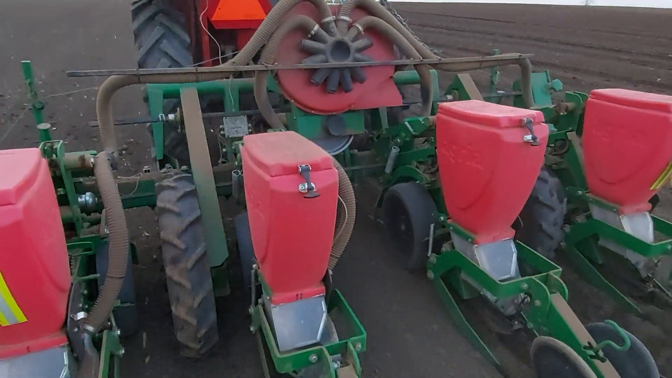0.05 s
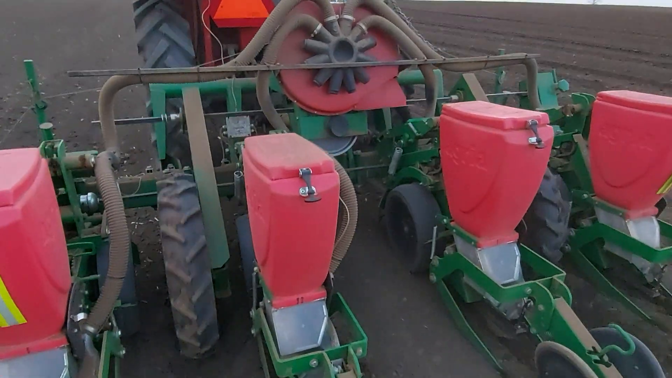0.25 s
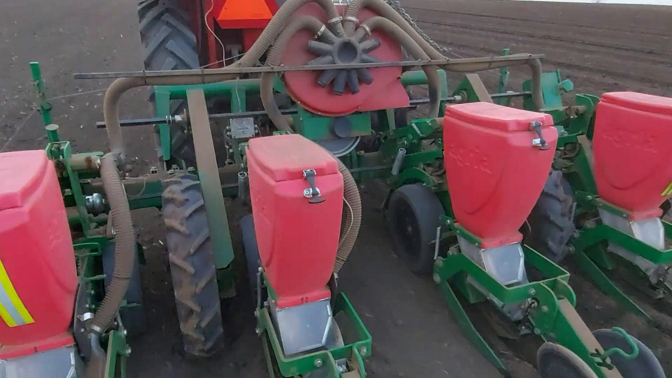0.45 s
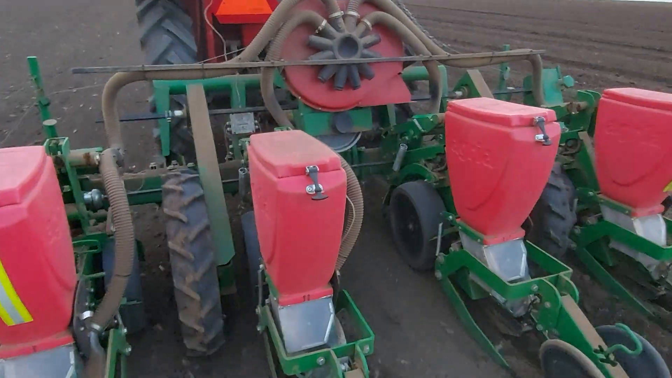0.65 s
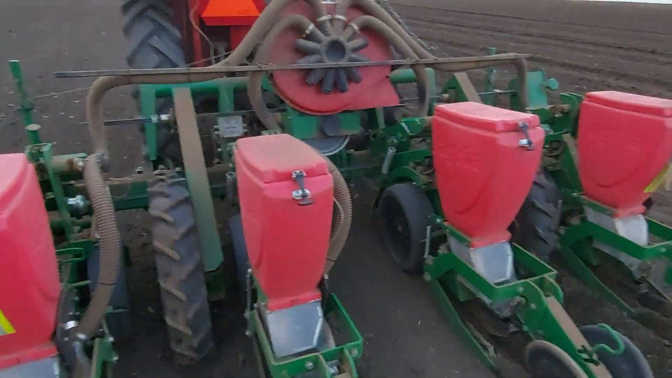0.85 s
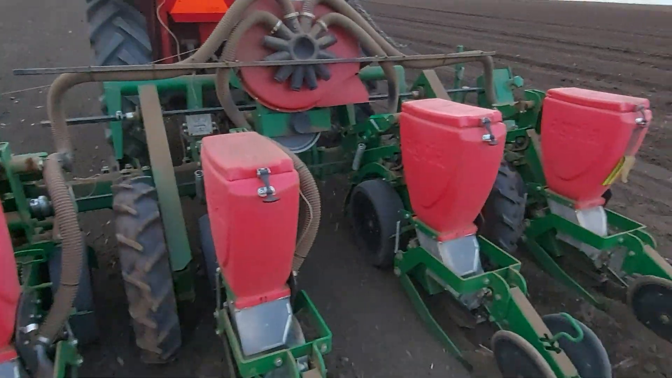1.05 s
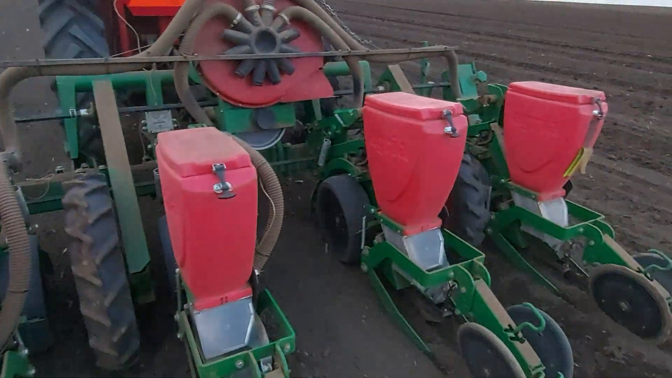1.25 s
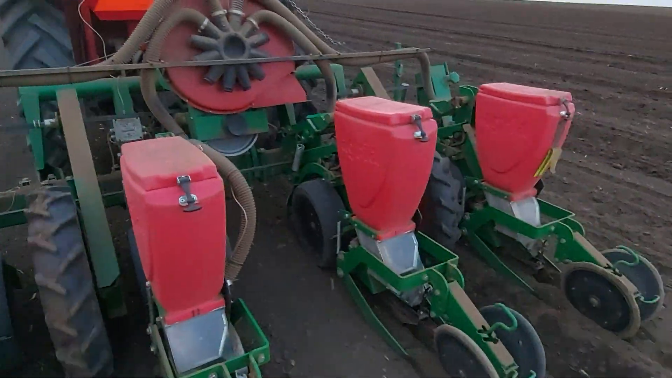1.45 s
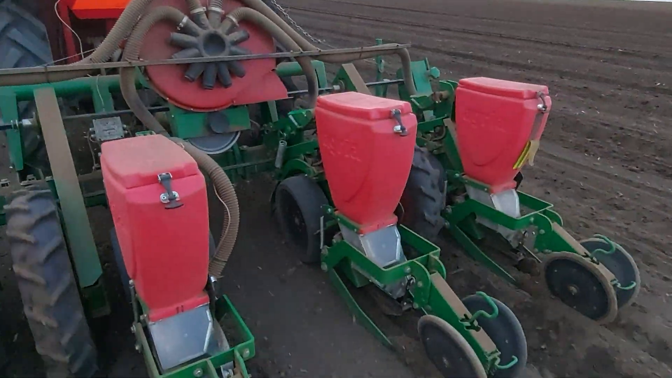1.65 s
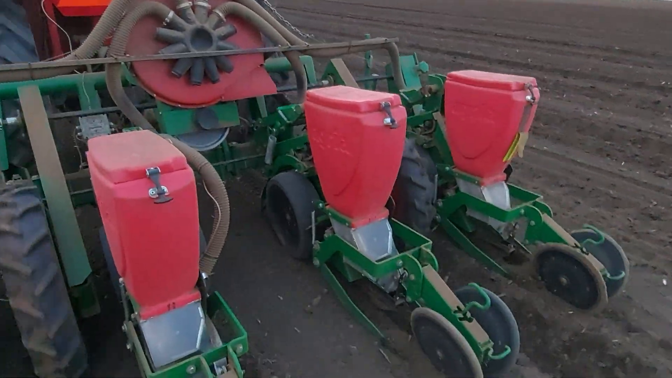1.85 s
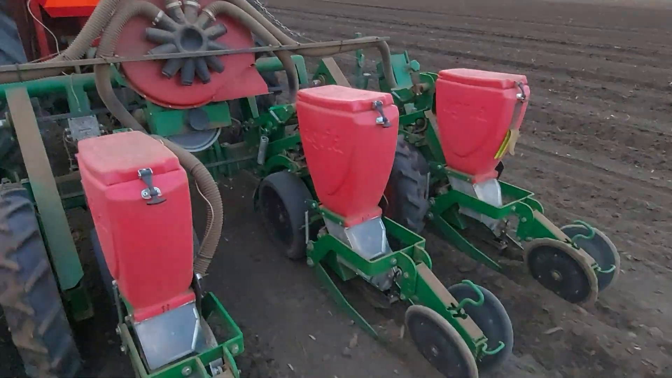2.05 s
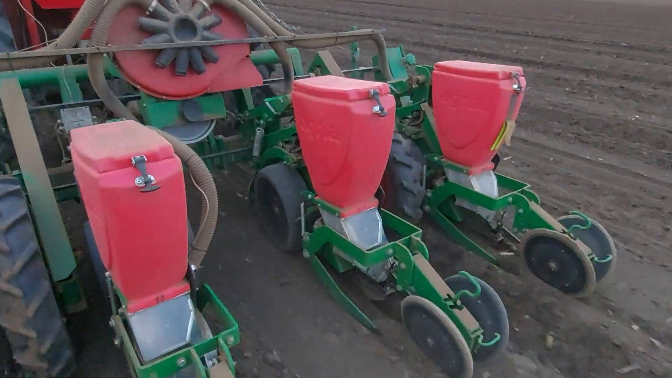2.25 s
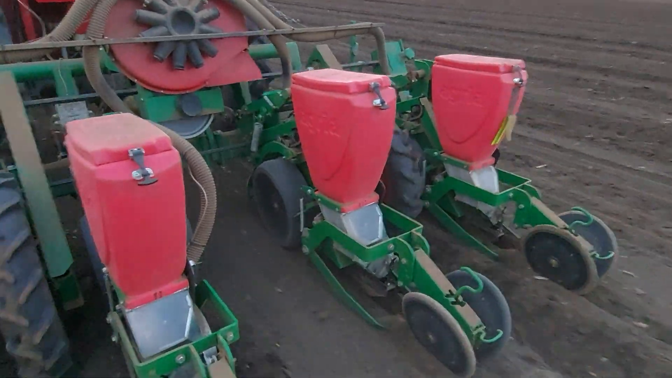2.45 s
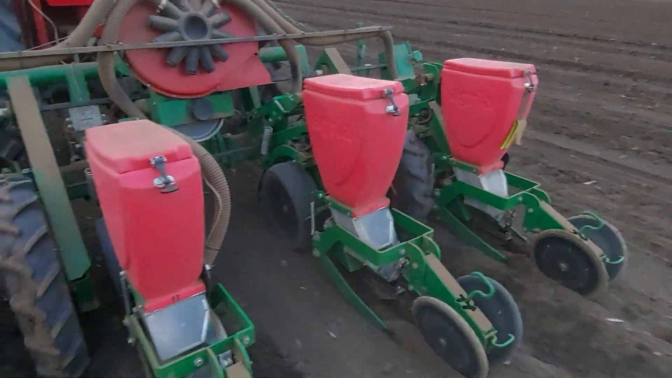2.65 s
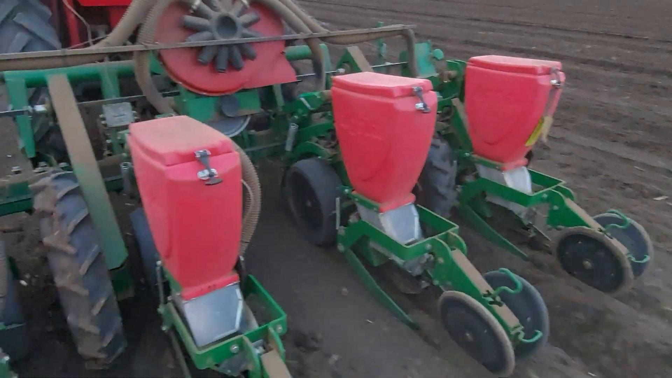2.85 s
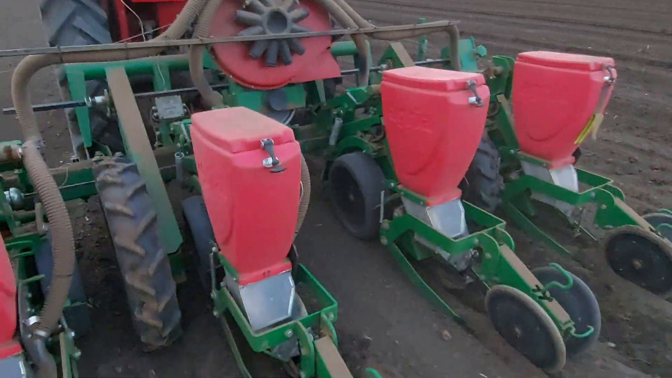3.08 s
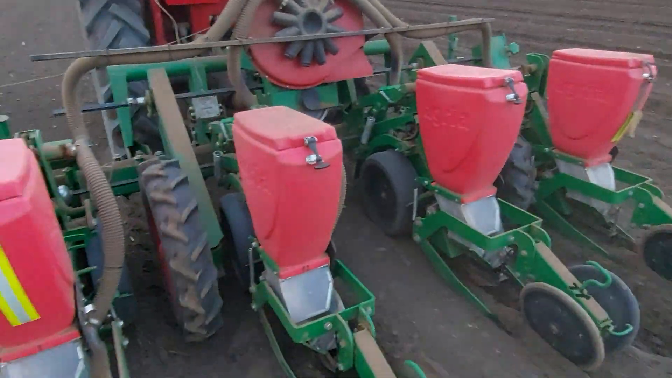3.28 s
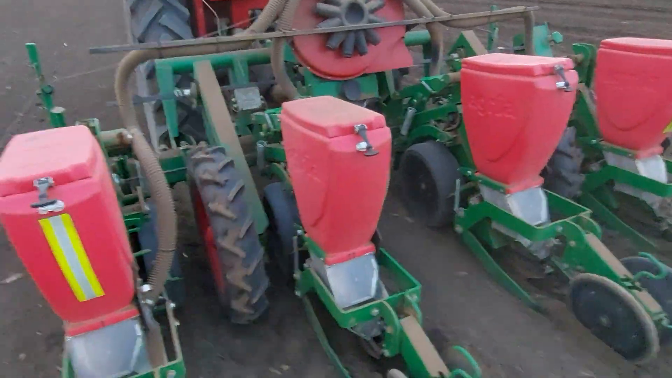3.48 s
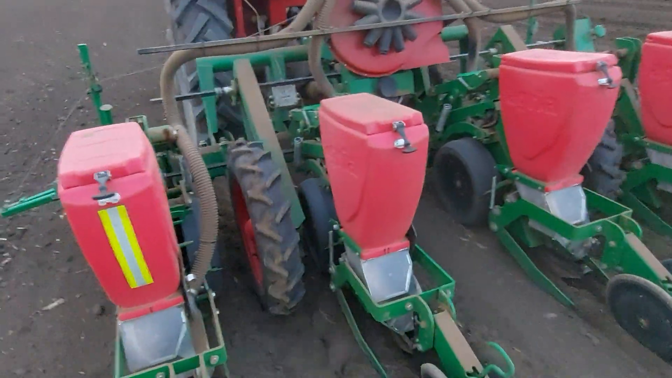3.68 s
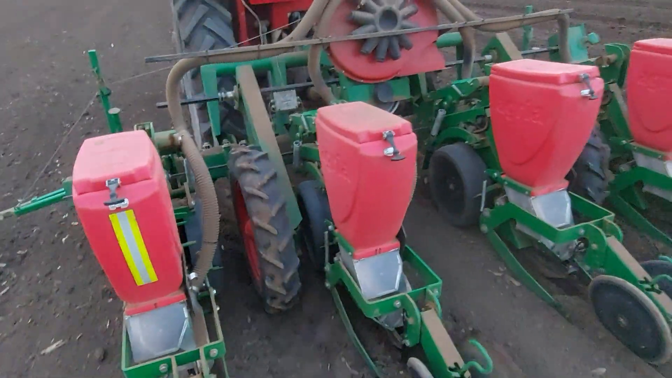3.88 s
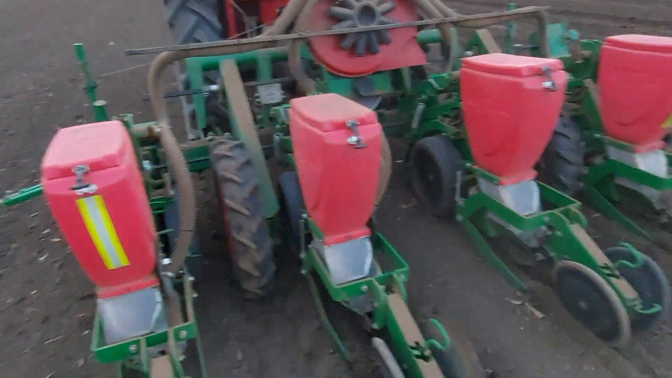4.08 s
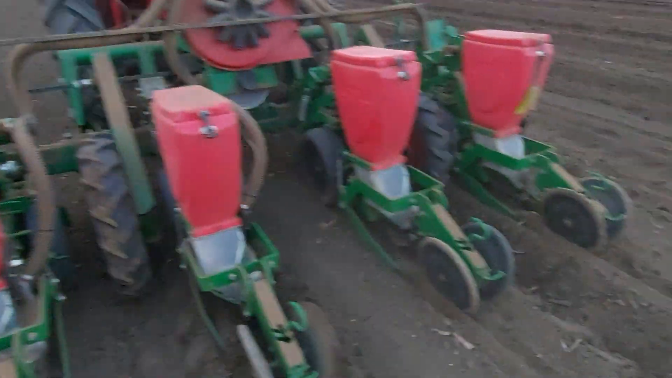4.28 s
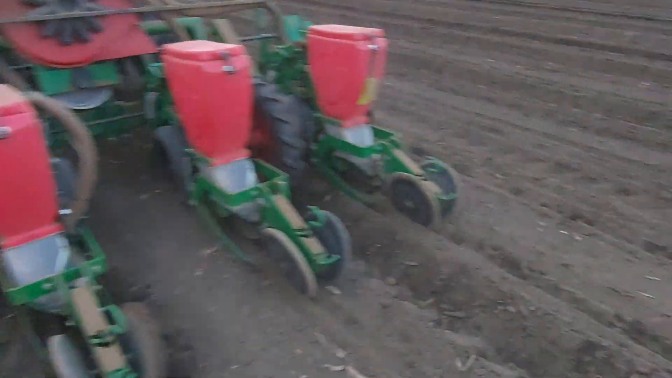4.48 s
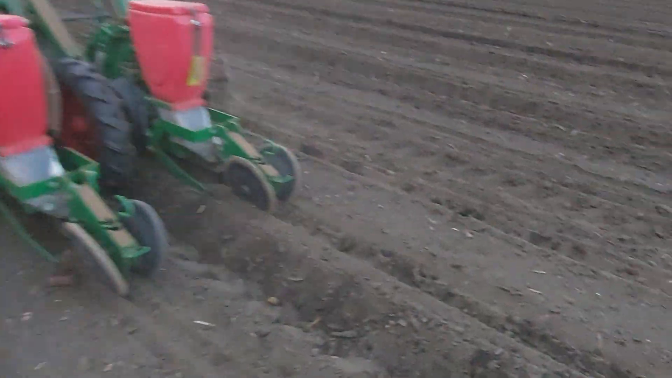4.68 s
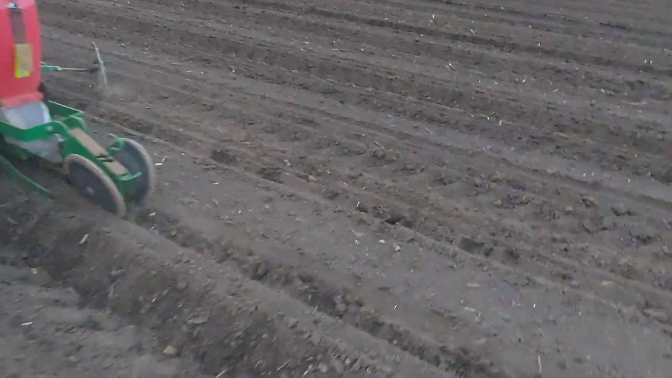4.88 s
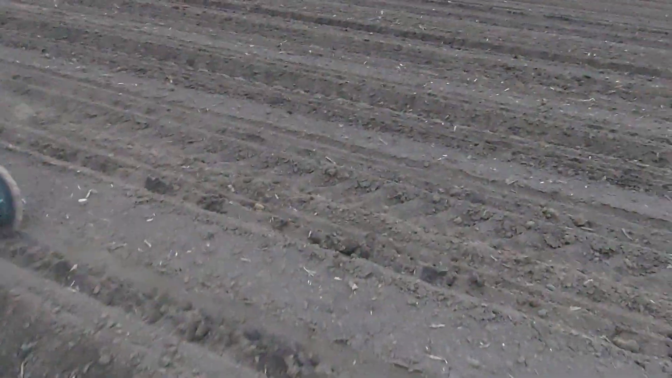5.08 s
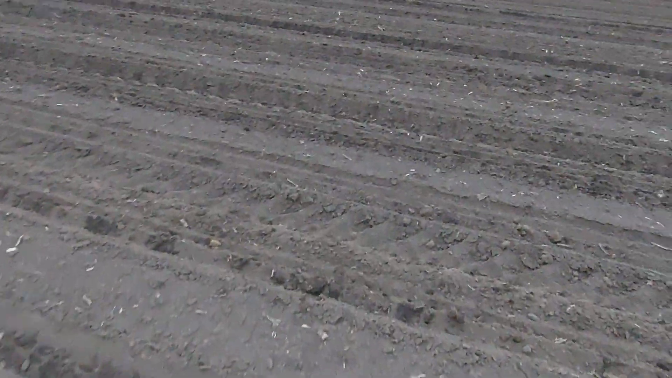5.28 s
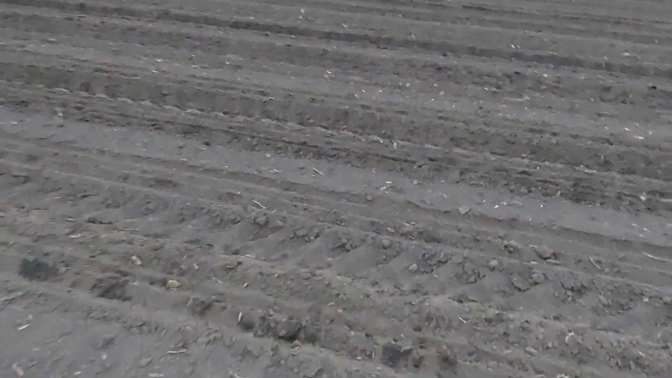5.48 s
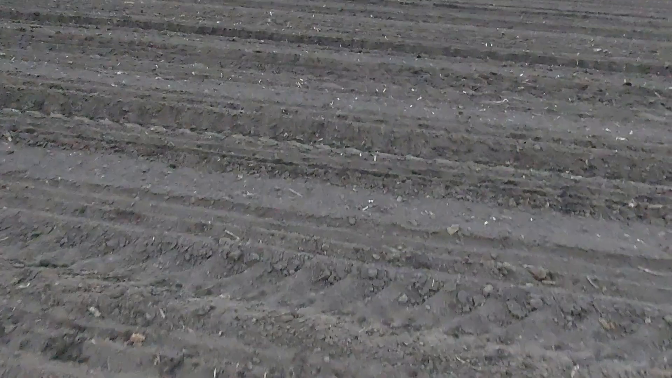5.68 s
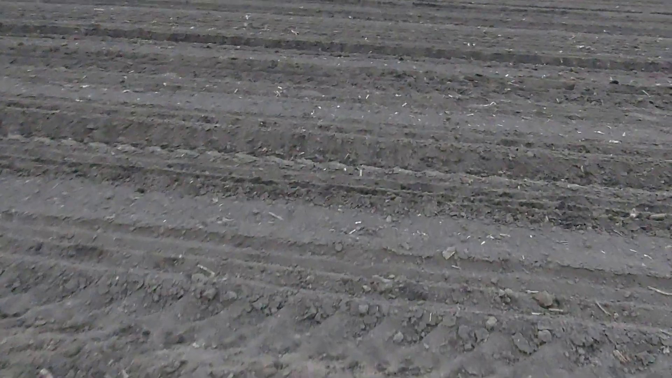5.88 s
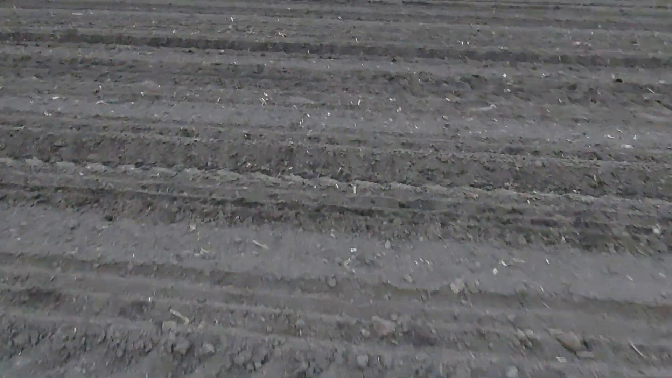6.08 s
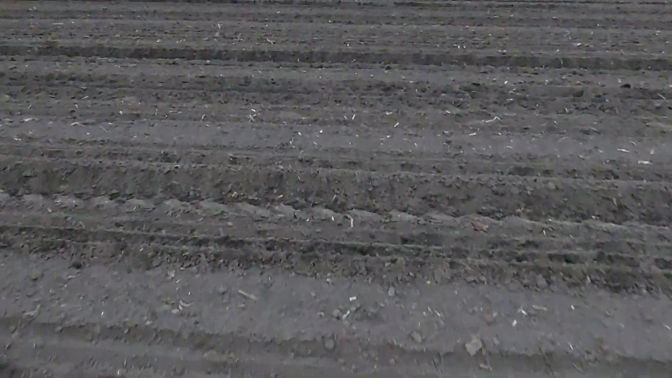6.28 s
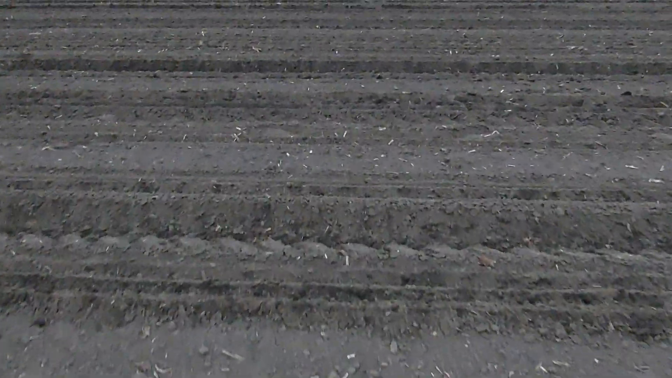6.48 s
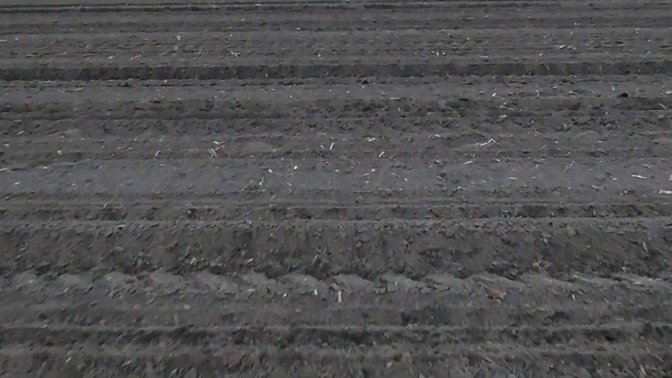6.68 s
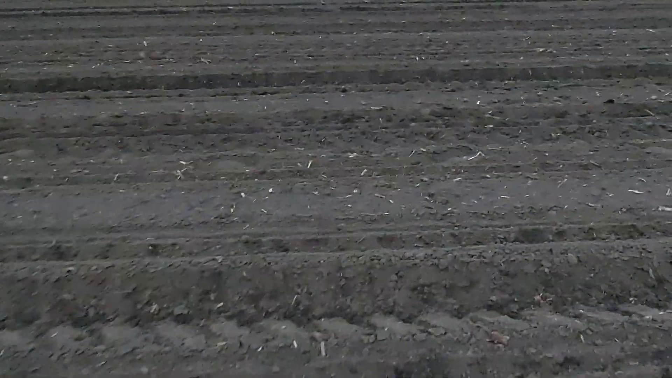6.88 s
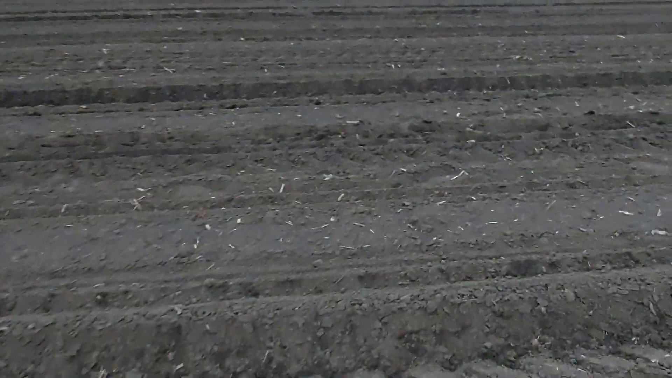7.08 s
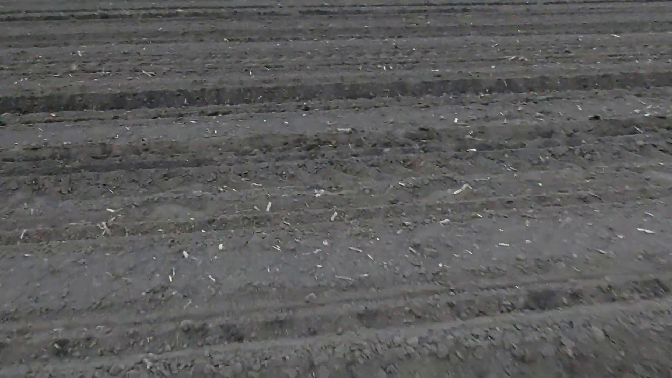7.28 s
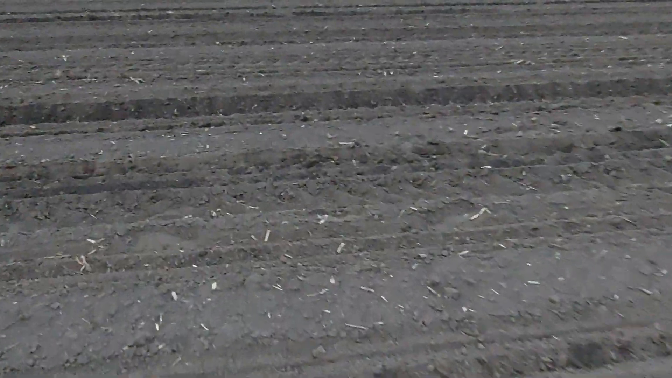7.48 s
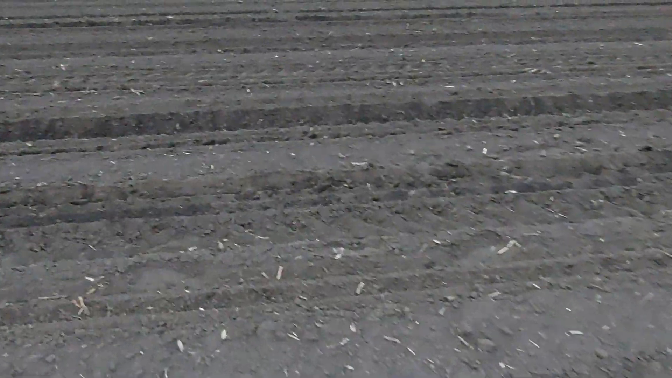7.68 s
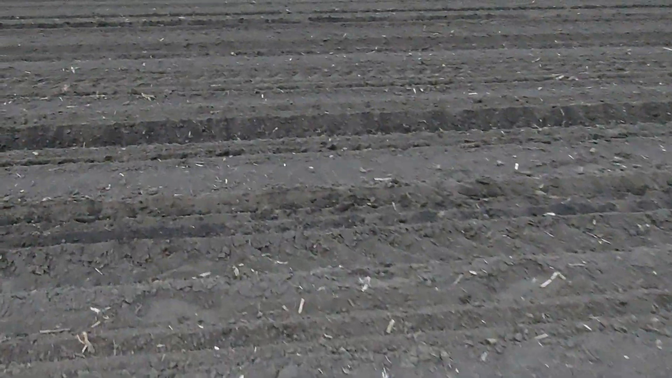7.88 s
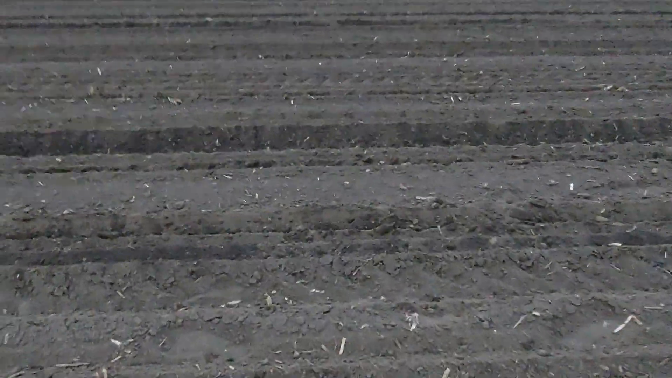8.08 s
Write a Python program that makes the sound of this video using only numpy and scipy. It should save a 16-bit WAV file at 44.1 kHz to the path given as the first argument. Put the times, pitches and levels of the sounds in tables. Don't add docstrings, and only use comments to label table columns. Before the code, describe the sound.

A loud, steady mid-pitched whine from a planter's vacuum fan dominates, wrapped in rough air roar and bright hose hiss, with a tractor engine humming low at fast idle. Heard close by in stereo in an open field. Just past the middle the listener turns away: the sound swings left, drops in level, loses its brightness and sinks very slightly in pitch, continuing to the end.

```python
import sys
import numpy as np
from scipy import signal
from scipy.io import wavfile
from scipy.ndimage import uniform_filter1d

SR = 44100
rng = np.random.default_rng(int(sys.argv[2]) if len(sys.argv) > 2 else 0)


def put_to_file(sound):
    columns = np.atleast_2d(sound).T
    safe = np.clip(columns, -1, 1)
    whole_steps = np.round(safe * 32767)
    wavfile.write(sys.argv[1], SR, whole_steps.astype(np.int16))


def gain_from_db(level_db):
    decades = np.asarray(level_db, float) / 20
    return 10 ** decades


N = 358974
TIME = np.arange(N) / SR
FRAME, HOP = 2048, 512

# (time [s], lead of the left one [ms])
TURN = [(0.0, -0.04), (0.45, -0.05), (1.63, 0.13), (2.1, 0.14), (2.44, 0.13), (3.66, -0.13), (4.07, -0.07),
        (4.27, 0.05), (4.48, 0.26), (4.68, 0.39), (4.88, 0.39), (5.09, 0.476), (5.45, 0.512), (6.0, 0.51),
        (6.51, 0.5), (6.92, 0.48), (7.28, 0.436), (8.14, 0.49)]
# (time [s], share [0-1])
AWAY = [
    (4.3, 0),
    (4.9, 0.34),
    (5.5, 0.78),
    (6.8, 1),
]
# (time [s], frequency [Hz])
BLADE_PITCH = [(0.0, 624.2), (0.48, 624.2), (0.96, 624.8), (1.44, 623.7), (1.92, 624.2), (2.39, 623.8),
               (2.87, 623.8), (3.35, 622.9), (3.83, 623.4), (4.31, 623.0), (4.79, 622.0), (5.27, 619.9),
               (5.75, 618.6), (6.22, 619.2), (6.7, 617.6), (7.18, 618.1), (7.66, 618.2), (8.14, 617.7)]
# (time [s], level [dB], left minus right [dB], left lead [ms])
BLADE_TONE = [(0.0, -11.5, 0, -0.05), (0.6, -12.5, 1.5, -0.067), (1.14, -11, -0.8, 0.04),
              (1.7, -13.5, -0.5, 0.07), (2.3, -12.5, -4, 0.1), (2.86, -14.5, -1, -0.032),
              (3.4, -13, 0, -0.053), (3.86, -13.5, 0.8, -0.17), (4.28, -13, -0.8, 0.01),
              (4.6, -11.5, 2.5, 0.091), (4.97, -23.5, 8, 0.4), (5.2, -19, 3.5, 0.41),
              (5.45, -23, 5.5, 0.52), (6.0, -19, 0, 0.64), (6.2, -20, -2.5, 0.52), (6.68, -17, -3.5, 0.44),
              (7.05, -18.5, 2.5, 0.32), (8.14, -21, 1.2, 0.32)]
# (lead [ms], left [dB], right [dB])
OCTAVE = [(-0.13, -24.5, -28.5), (-0.04, -26.5, -31), (0.02, -29, -30.5), (0.07, -46, -26.5),
          (0.15, -50, -28.5), (0.26, -29, -31), (0.39, -29.5, -38), (0.45, -35, -34.5), (0.52, -38, -44)]
# (lead [ms], upper left [dB], upper right [dB], lower left [dB], lower right [dB])
ROAR = [(-0.13, -25, -25.1, -24, -24), (-0.04, -22.5, -23.5, -24, -24), (0.06, -22, -23.5, -23, -23.3),
        (0.14, -21, -22, -22, -24.5), (0.26, -23.4, -24.5, -20.5, -23), (0.39, -24.5, -23.5, -27, -22),
        (0.45, -27.5, -29.5, -25.5, -25), (0.52, -27.5, -26, -27.5, -25.5)]
ROAR_LOSS = [0.61, 0.6, 1.2, 2.7]
# (lead [ms], middle left [dB], middle right [dB], top left [dB], top right [dB])
HISS = [(-0.13, -28.5, -24, -36, -29), (-0.04, -28, -25.5, -34.5, -30.5), (0.06, -27, -24, -32.4, -31.6),
        (0.14, -26.5, -23.2, -31.5, -31), (0.26, -27, -22.5, -32, -29), (0.39, -28, -21.5, -33, -32),
        (0.45, -30, -23.5, -34, -34), (0.52, -30, -24.5, -34.5, -38)]
HISS_LOSS = [1.65, 0.54, 1.3, 4.3]
# (frequency [Hz], density [dB per Hz])
HISS_FACING = [
    [(1500.0, 3.5), (1900.0, 0), (2300.0, 2), (3000.0, -2), (3600.0, 0.5), (4200.0, -1), (5000.0, -2.5), (6000.0, -0.5), (7200.0, -2.5), (8300.0, -9.5), (9200.0, -4), (10500.0, -8), (12000.0, -5.5), (15500.0, -8)],
    [(1500.0, -4), (1900.0, -1), (2300.0, -1), (3000.0, -0.5), (3600.0, -1), (4200.0, 0), (5000.0, 1.5), (6000.0, 3), (7200.0, -0.5), (8300.0, 0.5), (9200.0, -4), (10500.0, 0), (12000.0, 3.5), (15500.0, 2)],
]
# (frequency [Hz], density [dB per Hz])
HISS_AWAY = [
    [(1500.0, 0.0), (1900.0, -2.0), (2300.0, -0.0), (3000.0, -3.0), (3600.0, -2.0), (4200.0, -2.0), (5000.0, -5.0), (6000.0, -4.0), (7200.0, -8.0), (8300.0, -10.0), (9200.0, -11.0), (10500.0, -9.0), (12000.0, -6.0), (15500.0, -12.0)],
    [(1500.0, -3.0), (1900.0, -2.0), (2300.0, -2.0), (3000.0, -2.0), (3600.0, 0.0), (4200.0, -0.0), (5000.0, -7.0), (6000.0, -5.0), (7200.0, -7.0), (8300.0, -5.0), (9200.0, -15.0), (10500.0, -20.0), (12000.0, -18.0), (15500.0, -19.0)],
]
# (frequency [Hz], density [dB per Hz])
ROAR_FACING = [(190, -8.5), (230, -13), (290, -3), (370, -8.5), (430, -0.5), (490, -5), (560, 2),
               (650, -1.5), (720, -7.5), (810, -6), (870, -2), (960, -7.5), (1110, 0), (1400, -13.5)]
# (frequency [Hz], density [dB per Hz])
ROAR_AWAY = [(190, -7), (240, -10), (300, -5), (400, -3), (560, 0), (650, -1), (740, -5), (850, -7),
             (1010, -9), (1100, -5.5), (1180, -10), (1400, -14)]
# (frequency [Hz], density [dB per Hz])
RUMBLE = [(22, -21), (43, -9), (64, -3), (130, 3.5), (170, 0.5), (200, -8)]
# (time [s], level [dB])
RUMBLE_LEVEL = [
    (0, -30),
    (4.4, -30),
    (5.2, -34),
    (8.14, -33.5),
]
# (frequency [Hz], facing [0-1], away [0-1], extra lead away [rad])
LIKENESS = [(60, .87, .92, 0), (400, .96, .97, -.2), (1150, .93, .98, -.35), (1450, .55, .98, -.6),
            (2300, .6, .92, -.4), (3700, .5, .93, .05), (7000, .28, .86, 0), (10000, .15, .76, 0),
            (15000, .1, .6, 0)]
# (time [s], share of the extra lead)
BENDING = [(4.4, 0.0), (4.7, -1), (5.3, 0.53), (6.2, 1), (7.25, 1.45), (8.14, 1.2)]
# (time [s], frequency [Hz], depth [dB])
SHADOW = [(0, 1600, -1.5), (2.8, 1754, 1.5), (3.3, 3350, -0.5), (4.1, 3300, 2.5), (4.3, 2010, 0),
          (5.1, 3100, 11), (5.8, 4200, 7), (6.3, 5000, 2.5), ]
# (time [s], frequency [Hz], depth [dB])
GROUND_DIP = [(4.3, 430, -1), (4.8, 473, 6.5), (5.2, 510, 6), (5.6, 760, 4), (6.8, 980, 4), (8.14, 975, 9)]
# (time [s], frequency [Hz], depth [dB], negative lifts)
GROUND_LIFT = [(4.4, 300, 2.5), (5.0, 320, -5.5), (5.7, 382, -2.5), (6.5, 524, -3.5), (7.0, 740, -6.5),
               (8.14, 785, -6)]
# (time [s], frequency [Hz], depth [dB], negative lifts)
UPPER_LIFT = [
    (4.4, 720, 2),
    (4.75, 745, -8),
    (5.05, 790, -7.5),
    (5.4, 850, 0),
]
# (time [s], frequency [Hz], depth [dB], negative lifts)
HOSE_SONG = [
    (1.0, 2130, -1),
    (2.4, 2130, -5),
    (3.2, 2130, -7),
    (3.9, 2130, 2),
]
# (frequency [Hz], facing [dB], away [dB])
HOSES = [(1355, 4, 6), (1550, 2, 5), (1705, 4, 1), (1950, 3, 1), (2195, 1, 4), (2530, 4, 4), (2870, 4, 2),
         (3680, 3, 4), (4030, 3, 1), (4092, 5, 5), (4200, 1, 6), (4467, 3, 1), (5250, 3, 6)]
# (order, facing [dB], away [dB], unsteadiness [dB])
EXHAUST = [(2, -26, -25.5, 0.8), (3, -32, -30, 1), (4, -46, -50, 1), (5, -33.5, -39, 1.5), (6, -48, -48, 2),
           (7, -49.5, -48, 1), (8, -43.5, -46, 2)]
# (share of the blade pitch, facing [dB], away [dB])
GEARS = [(.624, -38, -41), (.867, -37, -45), (.977, -38, -50), (1.2466, -39, -40), (1.395, -40, -54),
         (1.56, -42, -49), (2.933, -49, -58), (3.425, -46, -50), (3.73, -56, -48), (4.008, -50, -50),
         (5, -52, -54)]
# (time [s], peak level [dB])
BUMPS = [
    (2.86, -28.5),
]


def in_time(rows, at):
    s, *columns = np.transpose(rows)
    return np.array([np.interp(at, s, column) for column in columns])


def at_hz(points, hz):
    return in_time([(np.log(p[0]), *p[1:]) for p in points], np.log(hz + 1))


def drift(rate, count, step=1):
    coarse = rng.standard_normal((count, N // 64 + 4000))
    r = np.exp(-128 * np.pi * rate / SR)
    slow = signal.lfilter([1], [1, -2 * r, r * r], coarse)[:, 3000:]
    slow = slow / slow.std(axis=1, keepdims=True)
    place = np.arange(0, N + FRAME, step) / 64
    return np.array([np.interp(place, np.arange(len(row)), row) for row in slow])


def turned(at):
    return np.clip(in_time(AWAY, at)[0], 0, 1)


def tone(hz, lead_ms, db, phase=0):
    half_lead = hz * lead_ms / 2000 * np.array([[1], [-1]])
    turns = np.cumsum(hz) / SR + half_lead
    return np.sqrt(2) * gain_from_db(db) * np.sin(2 * np.pi * turns + phase)


def fan():
    pitch, turn_lead = in_time(BLADE_PITCH, TIME)[0], in_time(TURN, TIME)[0]
    level_db, pan_db, lead_ms = in_time(BLADE_TONE, TIME)
    level_db = level_db + 0.6 * drift(2.05, count=1)[0, :N]
    flutter, waver, flutter_up = drift(16, count=3)[:, :N]
    blade_db = level_db + np.outer([0.5, -0.5], pan_db) + 0.5 * flutter
    octave_db = in_time(OCTAVE, turn_lead) - 1.5 + 2.5 * flutter_up
    blade = tone(pitch, lead_ms, blade_db, 0.09 * waver)
    octave = tone(2 * pitch, turn_lead - 0.03, octave_db, 0.62 * waver)
    return blade + octave


def heard(by_direction, loss_db_per_s, at):
    walked_s = np.maximum(at - 4.87, 0)
    return in_time(by_direction, in_time(TURN, at)[0]) - np.outer(loss_db_per_s, walked_s)


def dip(rows, hz, at, width):
    dip_hz, dip_db = in_time(rows, at)
    distance = np.log(hz[:, None] / dip_hz + 1e-9) / width
    return gain_from_db(-dip_db * np.exp(-distance ** 2))


def layer(hz, facing, away, turn, low_hz, high_hz, level_db, used_hz):
    colour = gain_from_db(at_hz(facing, hz).T * (1.5 - turn) + at_hz(away, hz).T * turn) ** 2
    total = colour[(hz > low_hz) & (hz < high_hz)].sum(axis=0)
    inside = (hz >= used_hz[0]) & (hz < used_hz[1])
    return colour * inside[:, None] * gain_from_db(level_db) ** 2 / total


def resonances(hz, at, turn):
    speed = in_time(BLADE_PITCH, at)[0] / BLADE_PITCH[0][1]
    width_hz, ridge_db = 21, 0
    for mode_hz, near, far in HOSES:
        ridge = np.exp(-((hz[:, None] - mode_hz * speed) / width_hz) ** 2)
        ridge_db = ridge_db + (near + (far - near) * turn) * ridge
    ripple = uniform_filter1d(rng.standard_normal(len(hz)), size=2) * (hz > 700) * (hz < 9000)
    return gain_from_db(ridge_db) * gain_from_db(1.6 * ripple)[:, None]


def airflow():
    hz, at, white = signal.stft(rng.standard_normal((3, N)), SR, nperseg=FRAME, noverlap=FRAME - HOP)
    turn = turned(at)
    roar, hiss = heard(ROAR, ROAR_LOSS, at), heard(HISS, HISS_LOSS, at)
    facing, away, extra = at_hz(LIKENESS, hz)
    merged = np.clip(1.4 * turn, 0, 1)
    alike = np.outer(facing, 1 - merged) + np.outer(away, merged)
    shade = dip(SHADOW, hz, at, 0.26)
    path = dip(GROUND_DIP, hz, at, 0.19) * dip(GROUND_LIFT, hz, at, 0.19)
    path = path * dip(UPPER_LIFT, hz, at, 0.14) * dip(HOSE_SONG, hz, at, 0.046)
    patches = drift(11.0, count=24, step=HOP)[:, :len(at)]
    band = np.clip(3 * np.log2(hz / 80 + 1), 0, 23).astype(int)
    gust = gain_from_db(0.25 * drift(5.5, count=1, step=HOP)[:, :len(at)] + 0.63 * patches[band])
    treble = np.clip(np.log2(hz[:, None] / 1000 + 1e-9), 0, 3)
    scatter = drift(0.37, count=24, step=HOP)[band, :len(at)] * treble * (1 - merged)
    lead = np.exp(1j * np.pi * np.outer(hz, in_time(TURN, at)[0] / 1000))
    lead = lead * np.exp(0.5j * (np.outer(extra, in_time(BENDING, at)[0]) + 0.4 * scatter))
    ridges = resonances(hz, at, turn)
    rumble_db = in_time(RUMBLE_LEVEL, at)[0]
    out = []
    for side in (0, 1):
        hiss_colours = HISS_FACING[side], HISS_AWAY[side]
        power = layer(hz, RUMBLE, RUMBLE, turn, 0, 190, rumble_db, (0, 190))
        power += layer(hz, ROAR_FACING, ROAR_AWAY, turn, 200, 570, roar[2 + side], (190, 690))
        power += layer(hz, ROAR_FACING, ROAR_AWAY, turn, 680, 1210, roar[side], (690, 1400))
        power += layer(hz, *hiss_colours, turn, 1400, 8500, hiss[side], (1400, 9150))
        power += layer(hz, *hiss_colours, turn, 9000, 15500, hiss[2 + side], (9150, 15720))
        common = np.sqrt(alike) * white[0] * (lead.conj() if side else lead)
        private = np.sqrt(1 - alike) * white[1 + side]
        shaped = (common + private) * np.sqrt(power * FRAME / 2) * gust * ridges * path
        if side:
            shaped = shaped * shade
        out.append(signal.istft(shaped, SR, nperseg=FRAME, noverlap=FRAME - HOP)[1][:N])
    return np.array(out)


def tractor():
    pitch, turn, lead_ms = in_time(BLADE_PITCH, TIME)[0], turned(TIME), in_time(TURN, TIME)[0]
    swell = drift(5.3, count=len(EXHAUST) + len(GEARS))[:, :N]
    sway = drift(5.3, count=len(GEARS))[:, :N]
    bass_lead_ms = lead_ms + 0.1
    out = np.zeros((2, N))
    for k, (order, near, far, loose) in enumerate(EXHAUST):
        level_db = near + (far - near) * turn + loose * swell[k]
        out += tone(order / 18 * pitch, bass_lead_ms, level_db, np.pi / 2)
    start = rng.uniform(0, 2 * np.pi, len(GEARS))
    for k, (share, near, far) in enumerate(GEARS):
        level_db = near + (far - near) * turn + 2.4 * swell[-1 - k]
        out += tone(share * pitch, lead_ms, level_db, start[k] + 1.12 * sway[k])
    return out


def bump():
    out = np.zeros(N)
    for s, db in BUMPS:
        since = TIME - s
        out += gain_from_db(db) * np.exp(-(since / 0.018) ** 2) * np.sin(2 * np.pi * 52 * since)
    return out


def scene():
    return fan() + airflow() + tractor() + bump()


def low_pass(x):
    return signal.sosfilt(signal.butter(12, 17060, fs=SR, output="sos"), x)


def record(dry):
    mix = np.clip(dry, -1, 1)
    return low_pass(mix)


dry = scene()
out = record(dry)
put_to_file(out)
```